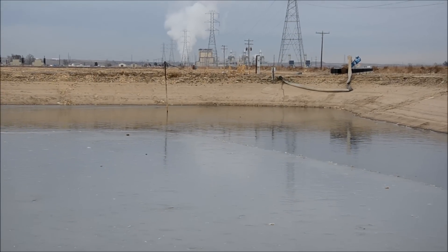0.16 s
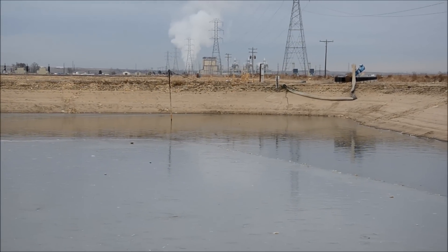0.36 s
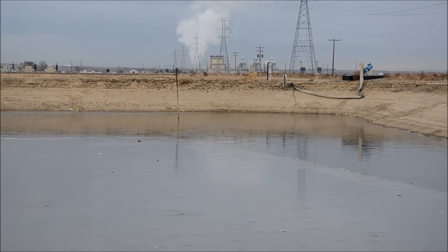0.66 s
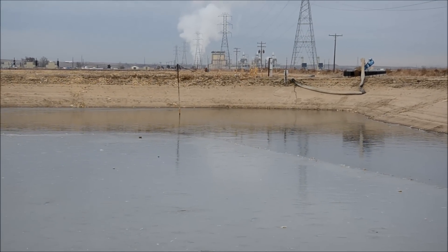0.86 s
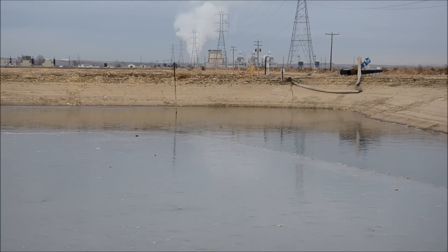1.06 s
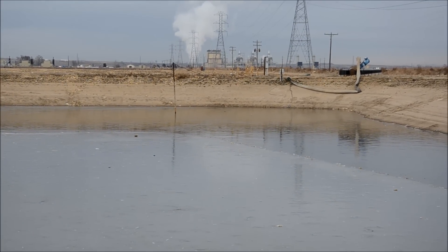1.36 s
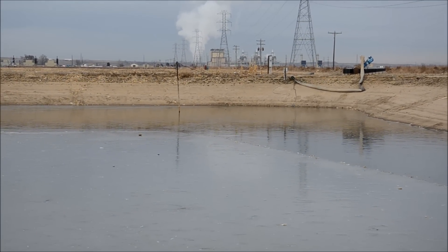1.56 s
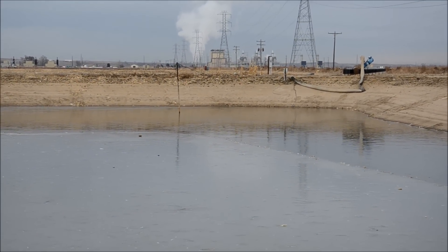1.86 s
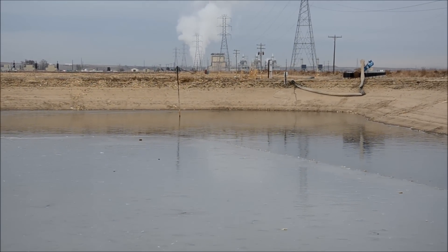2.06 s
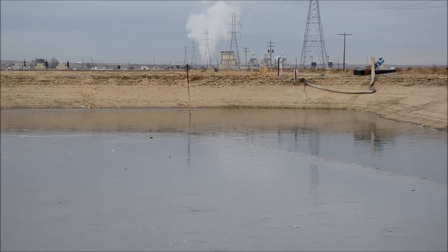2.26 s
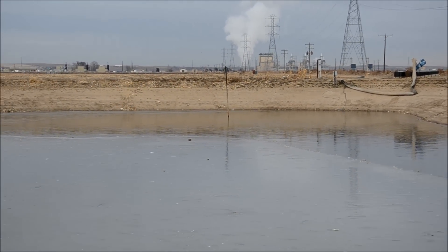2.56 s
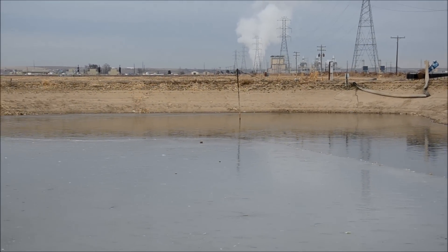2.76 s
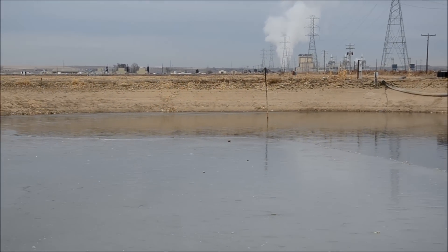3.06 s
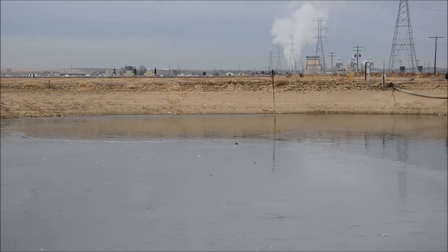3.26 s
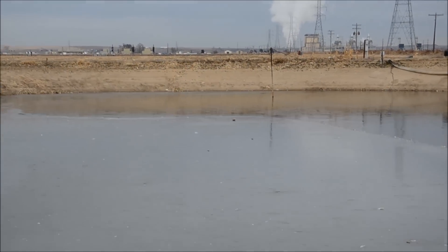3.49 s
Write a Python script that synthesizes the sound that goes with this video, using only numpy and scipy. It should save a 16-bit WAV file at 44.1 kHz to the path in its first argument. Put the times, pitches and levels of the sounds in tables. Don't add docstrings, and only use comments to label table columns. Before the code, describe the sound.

Rapid irregular chirping pulses ring from a stone bouncing over a frozen pond, stop, then a second stone cracks hard close by. Faint wind, clothing rustle and bumps on the hand-held microphone.

```python
import sys
import numpy as np
from scipy import signal
from scipy.fft import rfft, irfft
from scipy.io import wavfile
from scipy.ndimage import uniform_filter1d

SR = 44100
rng = np.random.default_rng(int(sys.argv[2]) if len(sys.argv) > 2 else 0)


def volts(x):
    e = np.asarray(x, float) / 20
    return 10 ** e


def file_out(sig):
    cols = np.atleast_2d(sig).T
    lim = np.clip(cols, -1, 1)
    pcm = np.round(lim * 32767).astype(np.int16)
    wavfile.write(sys.argv[1], SR, pcm)


N = 160083


def coloured(points):
    hz, db = np.array(points).T
    f = np.maximum(np.fft.rfftfreq(N, 1 / SR), 1)
    gain = volts(np.interp(np.log(f), np.log(hz), db))
    x = irfft(rfft(rng.standard_normal(N)) * gain, N)
    return x / x.std()


def band(x, hz, width_hz):
    b, a = signal.iirpeak(hz, hz / width_hz, fs=SR)
    return signal.lfilter(b, a, signal.lfilter(b, a, x))


def walk(rate_hz):
    k = int(SR / rate_hz)
    held = np.repeat(rng.standard_normal(2000), k)[:N]
    return 1.3 * uniform_filter1d(uniform_filter1d(held, k), k)


def curve(rows):
    return volts(np.interp(np.arange(N) / SR, *np.array(rows).T))


def add(out, s, x):
    i = int(s * SR)
    a, b = max(i, 0), min(i + len(x), N)
    if b > a:
        out[a:b] += x[a - i:b - i]


def glide(hz, turn=0):
    return np.sin(2 * np.pi * (np.cumsum(hz) / SR + turn))


# (time [s], level [dB])
WIND = [(0, -54), (2.6, -53.5), (3.02, -52), (3.1, -46.5), (3.25, -44.5), (3.42, -45.5), (3.5, -43.5),
        (3.63, -43)]
# (frequency [Hz], density [dB per Hz])
FLOOR_COLOUR = [(90, -40.5), (150, -9), (500, -18), (1100, -19.5), (1700, -22.5), (3000, -34.5),
                (6500, -46), (16000, -60.5)]
WIND_HZ, WIND_WIDTH_HZ, FLOOR_DB = 85, 175, -54


def air():
    wind = band(rng.standard_normal(N), WIND_HZ, WIND_WIDTH_HZ)
    gusts = wind / wind.std() * curve(WIND) * volts(1.2 * walk(12))
    return gusts + coloured(FLOOR_COLOUR) * volts(FLOOR_DB + 0.38 * walk(34))


# (time [s], level [dB])
RUSTLE = [(0, -53), (.1, -63.5), (1.6, -86), (1.85, -62), (2.3, -61), (2.58, -72), (2.75, -53.5),
          (2.852, -50.5), (2.860, -38.5), (2.93, -51), (3.04, -71), (3.13, -73.5), (3.3, -51.5),
          (3.4, -83.5), (3.49, -49.5), (3.53, -68), (3.595, -58), (3.625, -41)]
# (frequency [Hz], density [dB per Hz])
CLOTH_COLOUR = [(120, -48.5), (250, -4), (400, -10.5), (851, -13.5), (1800, -8.5), (4600, -24),
                (16000, -52.5)]


def rustle():
    return coloured(CLOTH_COLOUR) * curve(RUSTLE) * volts(1.2 * walk(40) + 2.6 * walk(400))


BEND_HZ, BEND_END_HZ, BEND_S = 1400, 950, .0015


def bend(t, at_s, db, turn):
    u = (t - at_s) / BEND_S
    fall = BEND_END_HZ + (BEND_HZ - BEND_END_HZ) / (1 + np.exp(np.clip(1.43 * u, -20, 20)))
    return volts(db) * np.exp(-u ** 2 / 2) * glide(fall, turn)


ICE_S = [0, .005, .009, .020, .0225, .025, .034, .043, .058]
ICE_HZ = [2040, 2080, 2120, 2200, 2150, 2170, 2170, 2010, 1920]
ICE_DB = [-16, -3, 3, 5, -2, 4.5, 6, 5, 6]
LEAD_S, LEAD_GROWTH, CUT_S = .0242, .0109, .0004
SWELL_DB, SWELL_DB_S, FLUTTER_DB = 6.5, -.07, 1.5
EDGE_HZ, EDGE_S, EDGE_AT_S, EDGE_DB, EDGE_DB_S = 2060, .0014, .0035, 4.5, -2.6
BEND_AT, BEND_DB, BEND_DB_S, BEND_SCATTER_DB = .38, -10, 4.3, 1.5
SECOND_BEND_AT, SECOND_BEND_DB, SECOND_BEND_DB_S = .71, -19, 6.5
SHORE_HZ, SHORE_RISE_HZ_S, SHORE_AT, SHORE_S, SHORE_FALL_S = 889, 9020, .2645, .0058, .011
SHORE_DB, SHORE_DB_S = -9.5, -5
CLICK_HZ, CLICK_DB, CLICK_DB_S, CLICK_SCATTER_DB = 3000, -4, -2, 2


def skip(s, c):
    lead, pre = LEAD_S + LEAD_GROWTH * s, .016
    t = np.arange(int((pre + lead + .004) * SR)) / SR - pre

    gate = (t > 0) * np.clip((lead - t) / (CUT_S * (1 + s)) + 1, 0, 1)
    swell = (SWELL_DB + SWELL_DB_S * s) * (np.clip(t / lead, 0, 1) ** 2 - 1)
    flutter = FLUTTER_DB * np.sin(2 * np.pi * (t * (60 + 25 * c[0]) + c[1]))
    level = volts(np.interp(t, ICE_S, ICE_DB) + swell + flutter)
    tone = gate * level * glide(np.interp(t, ICE_S, ICE_HZ) * (1 + .00696 * c[3]), c[2])

    edge = np.exp(-((t - EDGE_AT_S) / EDGE_S) ** 2 / 2) * glide(EDGE_HZ + 0 * t, c[1])
    edge = volts(EDGE_DB + EDGE_DB_S * s) * edge

    first_db = BEND_DB + BEND_DB_S * s + BEND_SCATTER_DB * c[3]
    second_db = SECOND_BEND_DB + SECOND_BEND_DB_S * s + BEND_SCATTER_DB * c[0]
    slow = bend(t, BEND_AT * lead, first_db, c[4]) + bend(t, SECOND_BEND_AT * lead, second_db, c[5])

    v = t - SHORE_AT * lead
    hum = np.exp(np.minimum(v, 0) / SHORE_S - (np.maximum(v, 0) / SHORE_FALL_S) ** 2)
    hum = volts(SHORE_DB + SHORE_DB_S * s) * hum * glide(SHORE_HZ + SHORE_RISE_HZ_S * v, c[5])

    w = (t - lead) * CLICK_HZ
    click = -w * np.exp(.5 - (2.88 * w) ** 2) * 3
    click = volts(CLICK_DB + CLICK_DB_S * s + CLICK_SCATTER_DB * c[6]) * click
    return s - lead - pre, tone + edge + slow + hum + click


HALO_HZ, HALO_WIDTH_HZ, HALO_DB = 2365, 450, -19


def halo(x):
    grain = band(rng.standard_normal(N), HALO_HZ, HALO_WIDTH_HZ)
    return volts(HALO_DB) * grain / grain.std() * uniform_filter1d(np.abs(x), size=150)


# (airborne click time [s], level [dB])
SKIPS = [(.030, -29), (.064, -44), (0.119, -27.5), (.173, -32.5), (.197, -36.5), (.215, -32.5),
         (.241, -49), (.283, -48), (.316, -25.5), (.341, -36.5), (.364, -36.5), (.412, -34.5),
         (.428, -42), (.478, -38), (.502, -36), (.527, -41), (.584, -46.5), (.623, -36.5),
         (.666, -34.5), (.728, -36), (.824, -29), (.837, -34.5), (.873, -30.5), (0.937, -37.5),
         (.988, -36), (1.006, -38.5), (1.068, -36.5), (1.087, -32.5), (1.113, -51.5), (1.192, -33.5),
         (1.204, -31.5), (1.236, -40), (1.269, -41.5), (1.330, -41), (1.377, -36.5), (1.454, -35),
             (1.492, -45), (1.525, -49.5), (1.599, -42), (1.690, -41), (1.560, -45.5), (1.627, -35.5),
             (1.671, -37), (1.713, -38.5), (1.784, -35.5), (1.838, -32), (1.917, -37.5), (1.936, -41.5),
             (1.976, -29), (2.000, -35.5), (2.107, -30.5), (2.130, -31), (2.168, -34), (2.235, -30.5),
             (2.258, -40.5), (2.301, -42), (2.379, -43.5), (2.439, -38.5), (2.462, -51), (2.497, -39.5),
             (2.552, -59), (2.610, -44.5), (2.680, -40), (2.816, -40)]
PATTER_COUNT, PATTER_ENDS_S, PATTER_DB, PATTER_RANGE_DB = 170, 2.72, -57.5, 7
PATCHY_DB, PATCHY_DB_S = .3, .8
SCATTER_DB, SCATTER_DB_S, SCATTER_T60_S = -17, 3.2, .07


def stone():
    out, rows, now = np.zeros(N), SKIPS, np.arange(N) / SR
    for (s, db), c in zip(rows, rng.standard_normal((len(rows), 7))):
        at, x = skip(s, c)
        add(out, at, np.sqrt(2) * volts(db - 5) * x)
    for c in rng.standard_normal((PATTER_COUNT, 7)):
        at, x = skip(rng.random() * PATTER_ENDS_S, c)
        add(out, at, volts(PATTER_DB + PATTER_RANGE_DB * rng.random()) * x)
    out = out * volts((PATCHY_DB + PATCHY_DB_S * now) * walk(220))
    t = np.arange(SR // 10) / SR
    flaws = rng.standard_normal(len(t)) * volts(-60 * t / SCATTER_T60_S)
    wet = signal.fftconvolve(out, flaws / np.linalg.norm(flaws))[:N]
    return out + halo(out) + wet * volts(SCATTER_DB + SCATTER_DB_S * now)


# (time [s], peak [dB], centre [Hz])
TICKS = [(0.1288, -57.5, 4880), (0.226, -56.5, 5300), (0.4968, -61, 4520), (0.8725, -63.5, 4800),
         (0.8925, -55, 5000), (1.703, -46.5, 4600), (1.7144, -58, 5120), (1.7968, -53, 4960),
         (1.8068, -56, 5160), (1.8353, -50, 4620), (1.863, -53.5, 4550), (1.8776, -61, 6440),
         (1.9164, -65, 4800), (1.934, -56, 5070), (2.1057, -52.5, 4700), (2.133, -47.5, 4670),
         (2.175, -56, 4570), (2.338, -52.5, 4830), (2.5974, -58, 5000), (2.658, -57, 5870),
         (2.6972, -54.5, 4800), (2.8573, -38.5, 4450), (3.1204, -48, 4860), (3.191, -62.5, 5170),
         (3.2266, -57, 4960), (3.299, -56.5, 6560), (3.3497, -47, 4560), (3.3772, -53.5, 4600),
         (3.2415, -53, 4800), (3.273, -46, 4100), (3.5696, -39.5, 3070), (3.611, -35, 3350),
         (3.6225, -30, 3230)]


def ticks():
    out, t = np.zeros(N), np.arange(SR // 8) / SR
    for s, db, hz in TICKS:
        snap = rng.standard_normal(len(t)) * volts(db + 9 - 60 * t / .007)
        add(out, s, band(snap, .85 * hz, 1.3 * hz))
    return out


# (time [s], level [dB])
SLEEVE = [(2.55, -79.5), (2.65, -69.5), (2.78, -61), (2.9, -69), (2.96, -66), (3.03, -58), (3.12, -72),
          (3.28, -67.5), (3.36, -67.5), (3.46, -63), (3.55, -65.5)]
# (frequency [Hz], density [dB per Hz])
SLEEVE_COLOUR = [(800, -18.5), (2000, -1), (4000, 6), (9000, -9.5), (12000, -33.5), (16000, -35)]


def sleeve():
    return coloured(SLEEVE_COLOUR) * curve(SLEEVE) * volts(1.2 * walk(60) + 3 * walk(500))


# (time [s], pitch [Hz], t60 [s], peak [dB])
BUMPS = [(2.62, 505, 0.026, -30.5), (2.636, 313, 0.05, -37.5), (2.759, 255, 0.035, -41),
         (2.762, 560, 0.093, -39), (2.78, 480, 0.036, -35), (2.782, 240, 0.03, -29.5),
         (2.877, 374, 0.033, -25.5), (3.298, 414, 0.015, -42.5), (3.391, 240, 0.04, -49),
         (3.451, 327, .03, -35), (3.456, 444, 0.041, -33.5), (3.481, 454, 0.016, -21.5),
         (3.484, 215, 0.066, -20), (3.518, 400, .03, -37), (3.539, 670, 0.023, -37),
         (3.622, 576, 0.026, -40)]


def bumps():
    out, t = np.zeros(N), np.arange(SR // 8) / SR
    for s, hz, t60_s, db in BUMPS:
        ring = glide(hz * (.9 + .3 * np.exp(-t / .008)))
        contact = 1.5 * band(rng.standard_normal(len(t)), 1.4 * hz, 1.4 * hz)
        onset = np.clip(t * hz / .54, 0, 1)
        add(out, s, (ring + contact) * onset * volts(db - 60 * t / t60_s))
    return out


# (time [s], start [Hz], end [Hz], length [s], peak [dB])
STRIKE = [(3.152, 4550, 3540, 0.0053, -34.5), (3.1556, 2176, 1975, 0.0047, 0),
          (3.1560, 1334, 1093, 0.004, -5), (3.1585, 4100, 3530, 0.0056, -16.5),
          (3.1613, 690, 1260, .0046, -13), (3.1637, 1322, 800, 0.0057, -14),
          (3.171, 1950, 1860, 0.003, -23), (3.183, 2330, 2320, 0.005, -39),
          (3.1895, 2160, 1860, 0.0062, -27.5), (3.198, 2000, 1800, 0.012, -43),
          (3.202, 1384, 1094, 0.031, -43), (3.26, 1360, 1170, 0.022, -45),
          (3.271, 1390, 1250, 0.007, -32.5), (3.154, 592, 242, 0.013, -32), (3.1565, 1647, 1526, .003, -3),
          (3.1675, 2100, 1950, 0.0032, -21.5), (3.171, 1123, 900, 0.0075, -32)]
# (frequency [Hz], density [dB per Hz])
CRACK_COLOUR = [(300, -10), (1500, 0), (3000, -5), (6500, -17), (16000, -46)]
STRIKE_ROUGH = .25
CRACK_S, CRACK_DB, CRACK_T60_S = 3.1562, -13, .011
TAIL_HZ, TAIL_DB, TAIL_T60_S = 1400, -33, .36


def strike():
    out, t = np.zeros(N), np.arange(SR // 2) / SR
    for s, hz, end_hz, length_s, db in STRIKE:
        u = np.linspace(0, 1, int(length_s * SR))
        grit = band(rng.standard_normal(N), hz, .4 * hz)
        grit = STRIKE_ROUGH * grit / grit.std()
        burst = glide(hz + (end_hz - hz) * u) + grit[int(s * SR):][:len(u)]
        add(out, s, volts(db) * np.sin(np.pi * u ** .63) ** .55 * burst)
    rise = np.clip(t / .0015, 0, 1)
    add(out, CRACK_S, coloured(CRACK_COLOUR)[:len(t)] * rise * volts(CRACK_DB - 60 * t / CRACK_T60_S))
    tail = band(rng.standard_normal(N), TAIL_HZ, 1000) * volts(2.2 * walk(60))
    add(out, CRACK_S, 4 * tail[:len(t)] * rise * volts(TAIL_DB - 60 * t / TAIL_T60_S))
    return out


def scene():
    handling = rustle() + ticks() + sleeve() + bumps()
    return (air() + stone() + handling + strike())[None]


def low_pass(x):
    return signal.sosfilt(signal.butter(12, 15800, fs=SR, output="sos"), x)


NOTCH_HZ, NOTCH_WIDTH_HZ, NOTCH_DEPTH = 5700, 810, .98


def record(dry):
    notched = dry - NOTCH_DEPTH * band(dry, NOTCH_HZ, NOTCH_WIDTH_HZ)
    return low_pass(np.clip(notched, -1, 1))


dry = scene()
out = record(dry)
file_out(out)
```